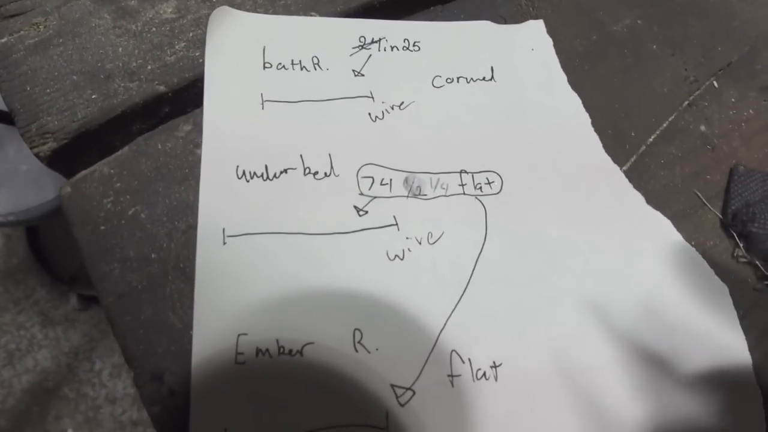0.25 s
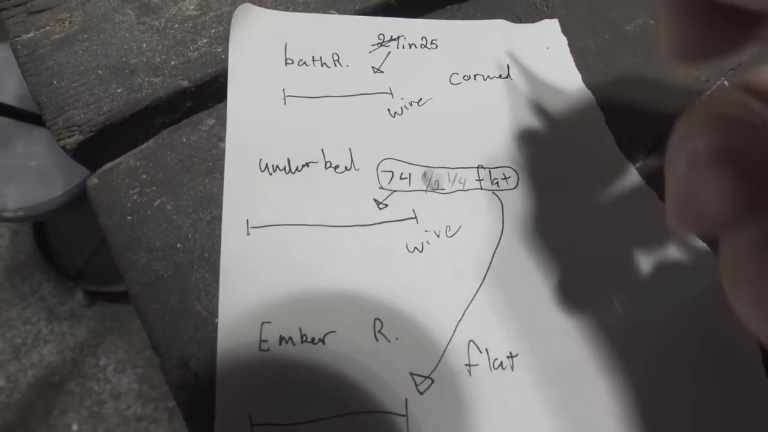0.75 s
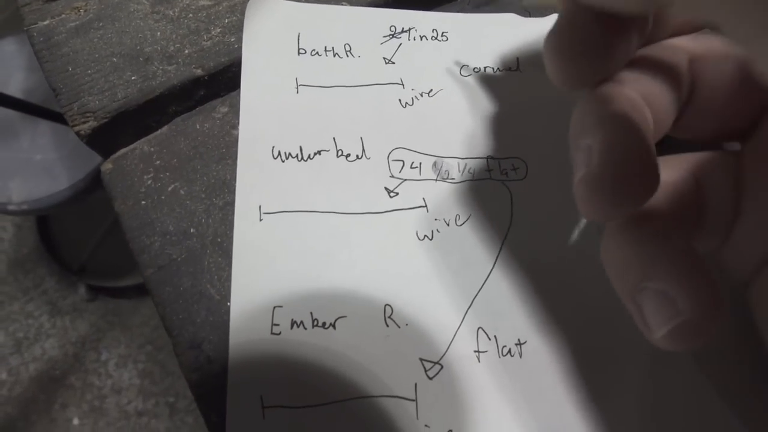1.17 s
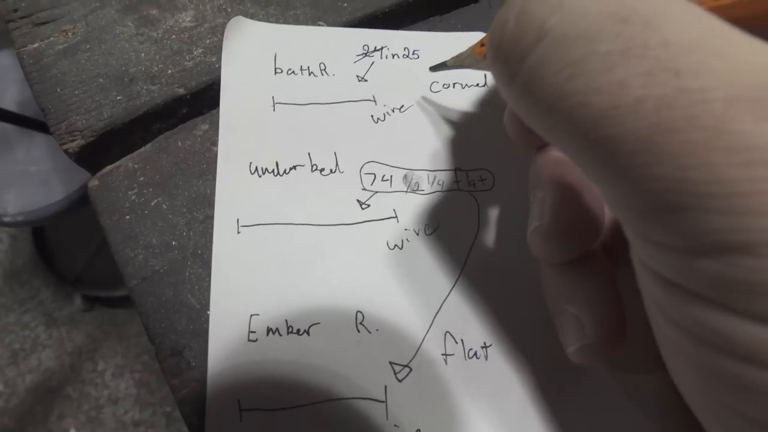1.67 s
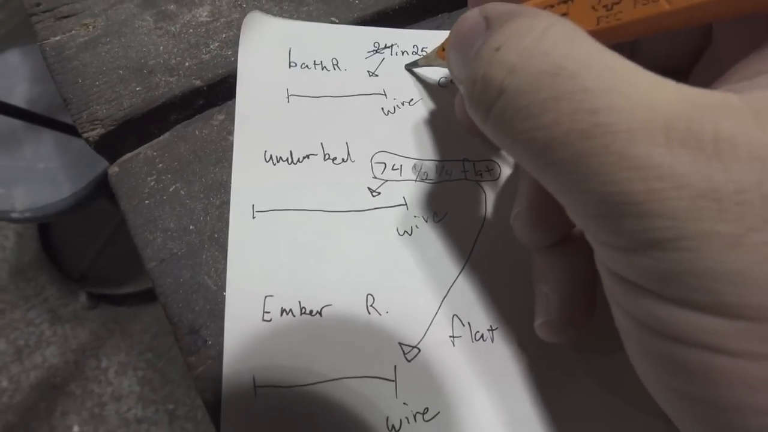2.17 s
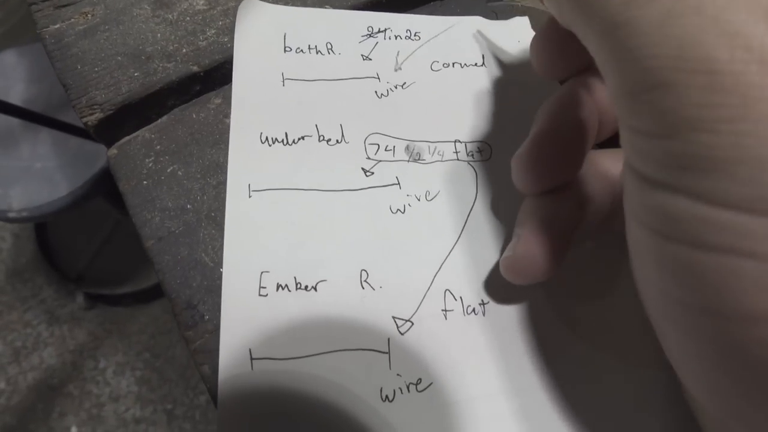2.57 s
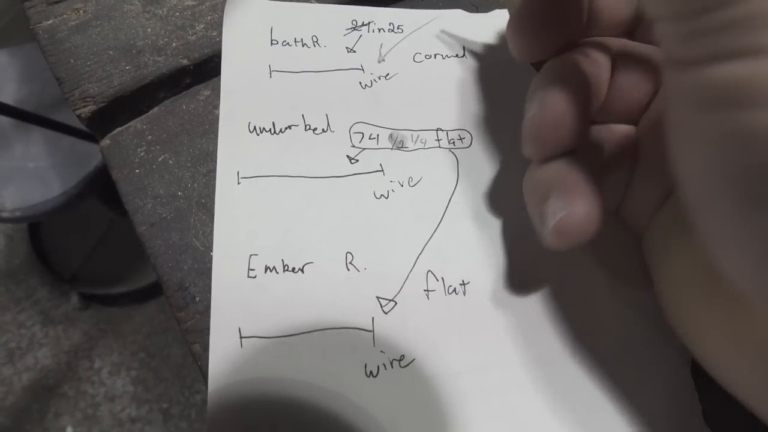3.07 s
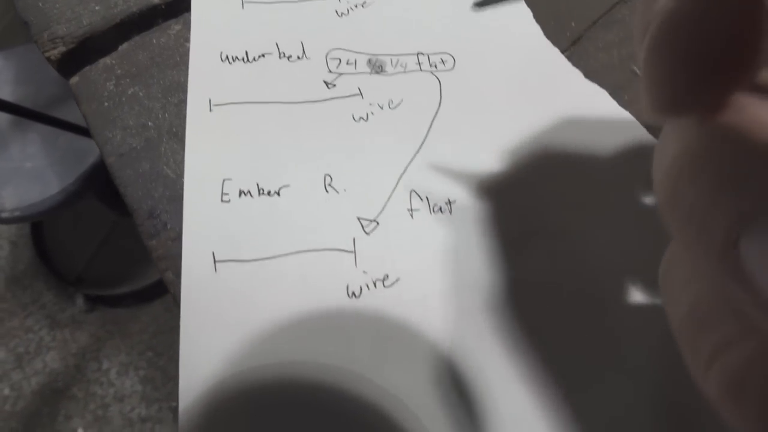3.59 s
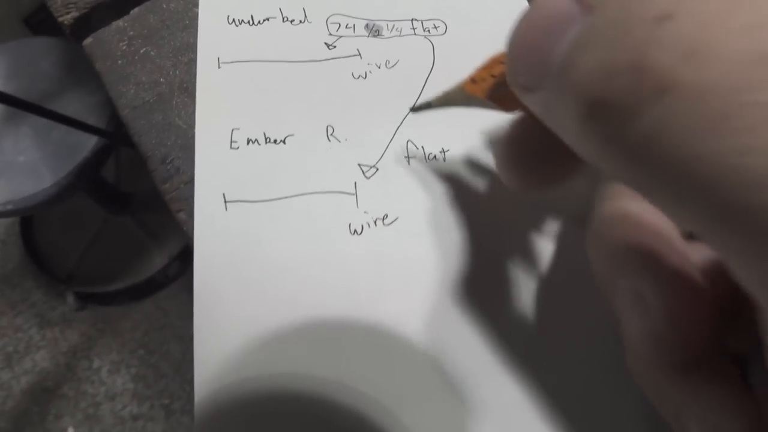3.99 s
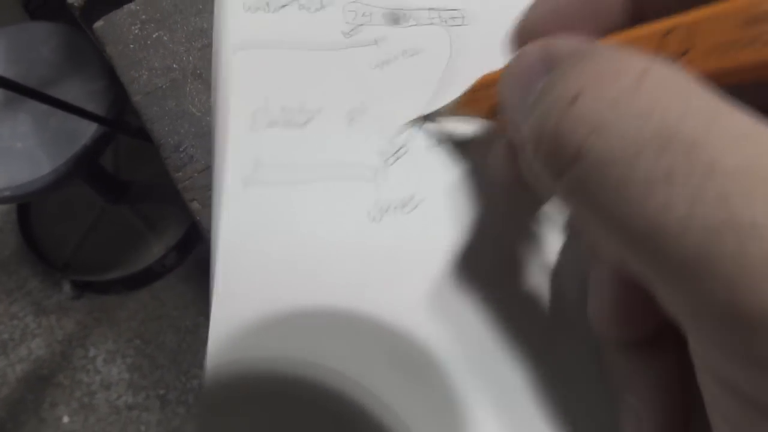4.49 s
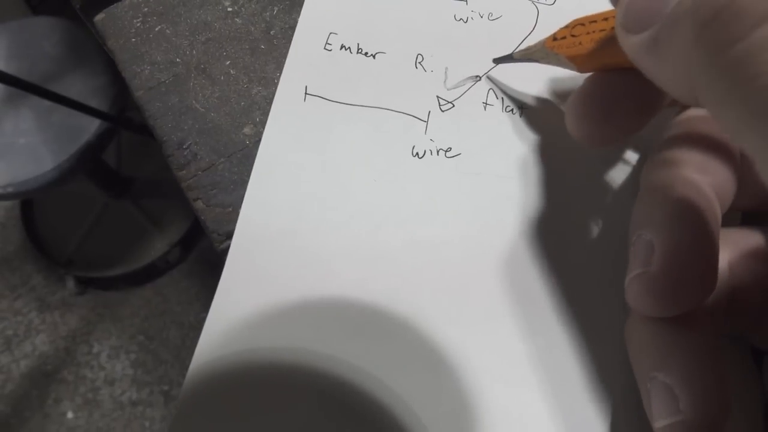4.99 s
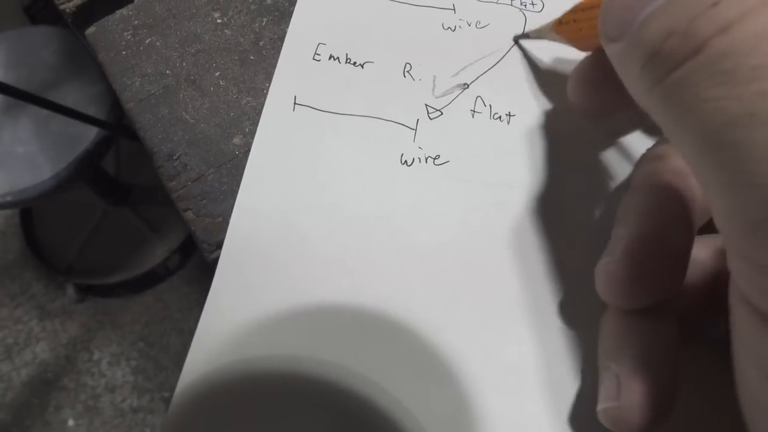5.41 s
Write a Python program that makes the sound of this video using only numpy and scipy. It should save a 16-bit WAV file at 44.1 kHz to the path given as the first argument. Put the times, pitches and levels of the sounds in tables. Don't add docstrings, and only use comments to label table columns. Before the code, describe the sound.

Constant electrical buzz, rich in high harmonics, wavers as the handheld camera moves. Beneath it are room rumble and hiss. Near and central, a pencil lands with small clicks and makes brief gritty strokes dragging paper over hard concrete, in three separate bursts, the middle one loudest. Skin and sleeve brush quietly, and distant dull knocks blur into the room. Stereo, close to the paper, with dulled extreme treble.

```python
import sys
import numpy as np
from scipy import signal
from scipy.fft import rfft, irfft, next_fast_len
from scipy.io import wavfile
from scipy.ndimage import uniform_filter1d, map_coordinates

SR = 44100
rng = np.random.default_rng(int(sys.argv[2]) if len(sys.argv) > 2 else 0)


def field_ratio(decibels):
    return 10 ** (np.asarray(decibels, dtype=float) / 20)


def store_pcm(level_fs):
    pcm = np.round(np.clip(level_fs, -1, 1) * 32767).astype(np.int16)
    wavfile.write(sys.argv[1], SR, np.atleast_2d(pcm).T)


N = 249165

# [f/Hz, width/Hz, level/dB]
LEAD_LOW_MODES = [(4000, 1000, -4), (6650, 1450, 0)]
# [f/Hz, width/Hz, level/dB]
LEAD_HIGH_MODES = [(9400, 1250, 0), (13400, 2300, -2.5)]
# [f/Hz, width/Hz, level/dB]
SUPPORT_MODES = [(260, 68, 3.5), (680, 120, 1), (1165, 270, -1)]


def unit(x):
    return x / np.sqrt(np.mean(x ** 2) + 1e-20)


def along(points, hz):
    f, v = np.transpose(points)
    return np.interp(np.log(hz + 1), np.log(f + 1), v)


def wobble(count):
    return np.interp(np.linspace(0, count, N), np.arange(count + 1), rng.standard_normal(count + 1))


def filtered(x, response):
    m = next_fast_len(N + 8192)
    return irfft(rfft(x, m) * response(np.fft.rfftfreq(m, 1 / SR)), m)[..., :N]


def resonant(modes):
    def response(f):
        return sum((-1) ** k * field_ratio(db) * 1j * f * width / (center ** 2 - f * f + 1j * f * width)
                   for k, (center, width, db) in enumerate(modes))
    return response


def buzz(scatter_db=4, drift_db=3, flutter_db=0.98, side_db=-11):
    # [multiple of buzz rate, crest rms/dB, crest
    partials = [(5, -56.5, 26.8, 200.0), (8, -53.5, -36.1, 200.0), (15, -52.0, 51.1, 200.0),
                (16, -53.0, 3.7, 31.1), (17, -45.0, 6.5, 33.6), (19, -50.5, 7.4, 16.5),
                (20, -43.5, 17.2, 19.0), (22, -47.5, 9.0, 29.3), (23, -53.0, 51.3, 200.0),
                (24, -45.0, 47.1, 102.7), (25, -53.0, 1.9, 13.0), (29, -52.0, 23.8, 19.1),
                (30, -47.0, 9.2, 14.7), (33, -54.0, 20.9, 199.9), (34, -48.0, 56.0, 101.2),
                (36, -51.0, 9.1, 15.9), (42, -56.0, 6.8, 18.8), (43, -49.5, -15.5, 51.5),
                (44, -53.0, 40.7, 54.1), (58, -56.0, 28.3, 18.2), (59, -61.0, -9.5, 37.2),
                (61, -66.5, 4.5, 8.1), (74, -65.0, 2.5, 38.9), (76, -67.5, 16.3, 29.0),
                (77, -70.0, 13.5, 66.7), (85, -68.0, 10.9, 30.4), (86, -65.0, 12.7, 44.3),
                (87, -66.0, 19.2, 19.9), (88, -68.5, 1.7, 9.6), (89, -64.5, -0.1, 11.7),
                (4, -60.0, 15.5, 108.4), (12, -57.0, 28.2, 42.3), (13, -57.0, 62.1, 200.0),
              (18, -60.5, 15.9, 16.4), (21, -48.0, -70.8, 158.5), (26, -57.5, -6.4, 26.7),
              (27, -59.5, 2.9, 46.7), (28, -52.0, -45.2, 120.9), (31, -61.5, 4.8, 15.6),
              (32, -59.0, 1.6, 9.7), (35, -61.0, 7.8, 19.0), (37, -58.0, 18.3, 11.7),
              (38, -62.5, 6.8, 11.3), (39, -62.0, 11.2, 23.8), (41, -66.5, 11.1, 52.6),
              (45, -66.0, 4.5, 15.9), (47, -61.5, 11.8, 29.9), (48, -62.5, 22.5, 82.3),
              (51, -67.5, 14.3, 14.6), (52, -59.0, 45.6, 77.9), (53, -60.5, 33.6, 43.0),
              (54, -63.0, 7.6, 11.9), (56, -66.5, 6.9, 20.2), (65, -70.5, 8.8, 7.7),
              (67, -69.0, -6.2, 21.4), (71, -64.5, -13.0, 45.5), (91, -64.0, -66.3, 171.8),
              (93, -70.0, -1.5, 14.1), (96, -77.5, 15.2, 14.3), (98, -71.0, 9.6, 15.0)]
    # [t/s, travel/cm]
    travel = [(0.0, 0.0), (0.4, 0.6), (0.8, -0.1), (1.2, 0.6), (1.35, 3.0), (1.5, 3.2), (1.9, 4.9),
              (2.2, 5.1), (2.7, 10.8), (3.1, 10.2), (3.25, 11.8), (3.45, 14.7), (3.7, 15.4), (3.95, 18.2),
              (4.2, 20.0), (4.4, 20.4), (4.9, 20.9), (5.65, 20.9)]
    # [f/Hz, level/dB]
    weak = [(100, -73.5), (1500, -71), (4800, -66.5), (7000, -73.5), (9500, -85), (12000, -83),
            (14000, -85), (15000, -100), (15600, -110)]
    # [f/Hz, level/dB]
    halfway = [(1500, -90), (2500, -70), (3300, -74), (4150, -68.5), (4800, -85), (6300, -75), (7500, -84),
               (9300, -85), (10400, -73), (11000, -94), (12000, -110)]
    mains_hz = 119.98 / 2
    echo = 0.76
    size, moments = 8192, 30
    hz = np.arange(262) * mains_hz
    t = np.arange(int(N / SR * moments) + 2) / moments

    def slow(count):
        knots = rng.standard_normal((len(hz), count + 1))
        grid = np.meshgrid(np.arange(len(hz)), t / t[-1] * count, indexing="ij")
        return map_coordinates(knots, grid, order=1)

    mean_db = np.where(np.arange(len(hz)) % 2, along(halfway, hz), along(weak, hz))
    mean_db = mean_db + scatter_db * rng.uniform(-1.8, 1.4, len(hz))
    level_db = mean_db[:, None] + drift_db * slow(count=7)
    place = np.interp(t, *np.transpose(travel))
    for multiple, db, crest, spacing in partials:
        field = np.abs(1 + echo * np.exp(2j * np.pi * (place - crest) / spacing)) / (1 + echo)
        level_db[2 * int(multiple)] = db + 20 * np.log10(field + 0.0023)
    level = field_ratio(level_db + flutter_db * slow(count=50))
    phase = 2 * np.pi * rng.random((len(hz), 1)) + 0.82 * slow(count=5)
    mid = level * np.exp(1j * phase)
    side = mid * field_ratio(side_db) * (0.46 * slow(count=3) + 1j * slow(count=3))
    cycles = irfft(np.array([mid + side, mid - side]), size, axis=1) * size / np.sqrt(2)
    cycles = np.concatenate([cycles, cycles[:, :1]], axis=1)
    now = np.arange(N) / SR
    position = [now * mains_hz % 1 * size, now * moments]
    return np.array([map_coordinates(c, position, order=1) for c in cycles])


def air():
    # [f/Hz, level/dB per Hz]
    spectrum = [(35, -34), (70, -14.5), (125, -1.5), (220, 1.5), (400, -8.5), (900, -11.5), (2200, -12.5),
                (3500, -17), (4600, -22), (5500, -25.5), (8500, -28.5), (11000, -26.5), (14000, -43),
                (14800, -35), (16000, -52)]
    # [f/Hz, correlation]
    likeness = [(60, 0.97), (250, .93), (700, 0.62), (2000, 0.42), (8000, 0.58)]

    def spread(hz):
        turn = np.arccos(np.clip(along(likeness, hz), -1, 1)) / 2
        return field_ratio(along(spectrum, hz)) * [np.cos(turn), np.sin(turn)]

    mid, side = filtered(rng.standard_normal((2, N)), spread)
    level_db = -50 + 4.0 + 0.61 * wobble(count=34)
    return field_ratio(level_db) * unit(np.array([mid + side, mid - side]))


def hand(apart=0.36, lumps_db=1.0):
    # [middle t/s, length/s, level/dB]
    slides = [
        (0.106, 0.25, -50),
        (1.64, 0.47, -46.5),
        (3.794, 0.62, -49),
        (4.632, 0.27, -45.5),
        (5.53, 0.099, -48.5),
    ]
    # [f/Hz, level/dB per Hz]
    skin = [(150, -14), (400, -5), (1200, 1.5), (2500, -4.5), (4000, -8), (6800, -9), (9000, -30)]
    t = np.arange(N) / SR
    gain = sum(field_ratio(db) * np.exp(-(2 * (t - middle) / length) ** 2) for middle, length, db in slides)
    mid, side = unit(filtered(rng.standard_normal((2, N)), lambda hz: field_ratio(along(skin, hz))))
    return gain * field_ratio(lumps_db * wobble(count=200)) * [mid + apart * side, mid - apart * side]


def rattle(t60=0.47, grain_db=2.5):
    # [t/s, level/dB]
    knocks = [(.01, -44), (0.419, -48), (.47, -46), (0.679, -45), (.76, -48), (1.19, -43), (1.501, -48),
              (1.72, -50), (3.164, -39), (3.178, -41), (3.194, -46), (3.24, -45), (3.86, -44), (4.507, -48),
              (5.501, -41), (5.54, -54)]
    # [f/Hz, width/Hz, level/dB]
    shelf = [(1840, 310, 0), (2230, 370, 0), (2800, 270, -1), (6000, 5000, -28)]
    t = np.arange(SR // 2) / SR
    out = np.zeros((2, N + len(t)))
    for s, db in knocks:
        same, apart = rng.standard_normal((2, len(t)))
        tail = field_ratio(db + 14 - 60 * t / t60) * (1 - np.exp(-t / 0.0049))
        out[:, round(s * SR):][:, :len(t)] += tail * [same + 0.35 * apart, same - 0.12 * apart]
    return filtered(out[:, :N] * field_ratio(grain_db * wobble(count=850)), resonant(shelf))


def taps():
    # [t/s, tick level/dB, knock level/dB]
    landings = [(0.084, -57, -34), (0.971, -46, -56), (1.35, -46, -50), (2.243, -35, -50),
                (2.254, -55, -27), (2.401, -19, -36), (2.414, -34, -19.5), (2.447, -37, -18.5),
                (2.56, -48, -48), (4.1, -35, -46), (4.415, -39, -55), (4.423, -42, -50), (4.567, -5.5, -32),
                (5.368, -29, -37), (5.375, -55, -22), (5.578, -34, -26)]
    ticks, knocks = np.zeros((2, N + 200))
    for s, tick_db, knock_db in landings:
        burst = rng.standard_normal(200) * field_ratio(-60 * np.arange(200) / SR / 0.005)
        ticks[round(s * SR):][:len(burst)] += field_ratio(tick_db + 14) * burst
        knocks[round(s * SR)] += field_ratio(knock_db + 30.5)
    lead = resonant(LEAD_LOW_MODES + LEAD_HIGH_MODES)
    support = resonant(SUPPORT_MODES)
    tick = filtered(ticks[:N], lambda f: lead(f) ** 2 / (1 + 1j * f / 9000) ** 2)
    knock = filtered(knocks[:N], lambda f: support(f) / (1 + 1j * f / 1600) ** 2 * 1j * f / (150 + 1j * f))
    return tick + knock


def contact_db(s, length, first_db, last_db):
    rise_db_per_s, fall_db_per_s = 2500, 2600
    t = np.arange(N) / SR - s
    held_db = np.interp(t, [0, length], [first_db, last_db])
    return held_db + rise_db_per_s * np.minimum(t, 0) - fall_db_per_s * np.maximum(t - length, 0)


def grit(spike_db, clump_db):
    spikes = np.minimum(rng.exponential(size=N), 5)
    return unit(rng.standard_normal(N) * field_ratio(spike_db * spikes + clump_db * wobble(count=1400)))


def strokes():
    # [start t/s, length/s, first level/dB, last level/dB, upper over lower ring/dB]
    lines = [(2.285, 0.06, -42.5, -37, -2.5), (2.338, .024, -33, -44, -5), (2.395, 0.0051, -41, -31, -0.5),
             (2.417, 0.028, -28.5, -23.5, 0), (2.447, 0.022, -26, -32, 1.5), (4.464, 0.044, -51, -45, 5.5),
             (4.546, .025, -42.5, -25, 10), (4.58, 0.036, -31.5, -27.5, 3), (4.63, 0.052, -53, -51, -4),
             (5.399, .034, -37, -26, -2.5), (5.431, 0.039, -31.5, -34, 2), (5.475, .015, -44, -50, -1),
             (5.572, 0.086, -42, -32.5, 0.5)]
    # [start t/s, length/s, first level/dB, last level/dB]
    drags = [
        (2.394, .007, -52, -48),
        (2.412, 0.042, -38, -37),
        (2.451, 0.023, -38, -43),
        (4.466, 0.047, -46.5, -42),
        (4.543, 0.029, -42, -25.5),
        (4.579, 0.035, -18.5, -21),
        (4.612, 0.06, -38, -53),
        (5.404, 0.076, -47, -43),
        (5.571, .09, -41, -44),
    ]
    # [f/Hz, level/dB per Hz]
    paper = [(600, -20), (1300, -4.5), (2400, -0.5), (3200, -1.5), (4400, 3), (5900, 2), (7200, -6.5),
             (8500, -6.5), (11000, -19), (14000, -23), (15600, -15), (16200, -50)]
    lines_db = np.array([contact_db(*row[:-1]) for row in lines])
    press_db = lines_db.max(axis=0)
    upper_db = (lines_db + np.array(lines)[:, -1:]).max(axis=0)
    drag_db = np.max([contact_db(*row) for row in drags], axis=0)

    thud_db, firm_db, thud_grows, thud_t60 = -31, -26.5, 2.3, 0.11
    fade = field_ratio(-60 / thud_t60 / SR)
    thud = signal.lfilter([1 - fade], [1, -fade], field_ratio(thud_db + thud_grows * (press_db - firm_db)))
    gains = uniform_filter1d([field_ratio(press_db), field_ratio(upper_db), field_ratio(drag_db), thud], size=60, axis=1)

    rough = grit(spike_db=0.0, clump_db=1.5)
    low = unit(filtered(rough, lambda f: resonant(LEAD_LOW_MODES)(f) ** 2))
    sharp = grit(spike_db=3.0, clump_db=1.3)
    high = unit(filtered(sharp, lambda f: resonant(LEAD_HIGH_MODES)(f) ** 2 / (1 + (f / 15300) ** 20)))
    slip = rough + grit(spike_db=-3.0, clump_db=2.6)
    sheet = unit(filtered(slip, lambda f: field_ratio(along(paper, f))))
    support = unit(filtered(grit(spike_db=1.5, clump_db=2.5), resonant(SUPPORT_MODES)))
    return np.sum(gains * [low * field_ratio(1.0), high, sheet * field_ratio(5.5), support * field_ratio(1.5)], axis=0)


def scene():
    near = taps() + strokes()
    port_modes = [(6000, 3000, -15), (10300, 1800, -12), (13500, 3000, -14)]  # f/Hz, width/Hz, level/dB
    side = filtered(near, lambda f: (0.3 - 1j) * resonant(port_modes)(f))
    return buzz() + air() + hand() + rattle() + [near + side, near - side]


def low_pass(x):
    return signal.sosfilt(signal.butter(12, 15900, fs=SR, output="sos"), x)


def record(dry):
    mix = filtered(dry, lambda f: 1 / (1 + (f / 15900) ** 60))
    return low_pass(mix)


dry = scene()
out = record(dry)
store_pcm(out)
```